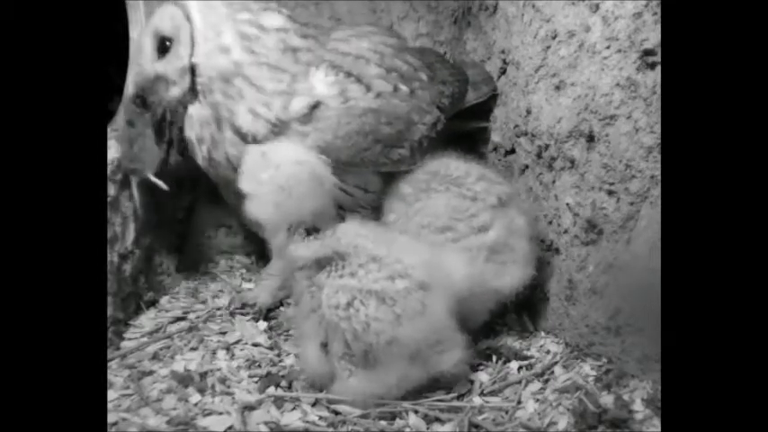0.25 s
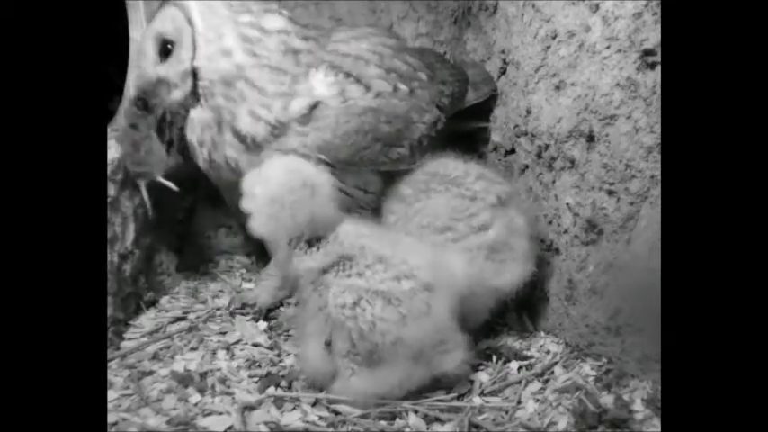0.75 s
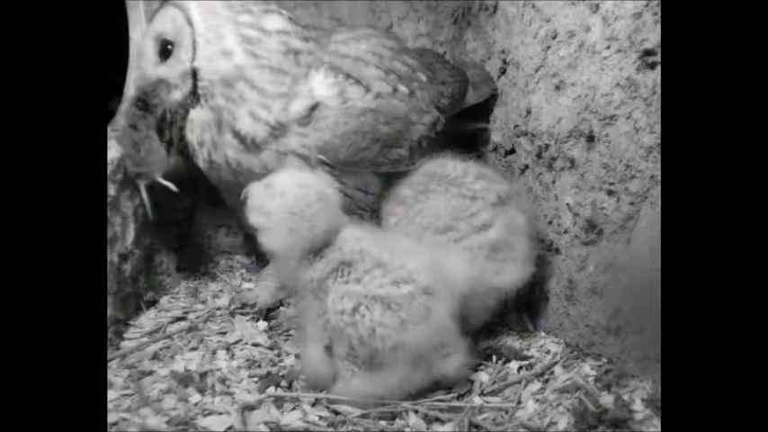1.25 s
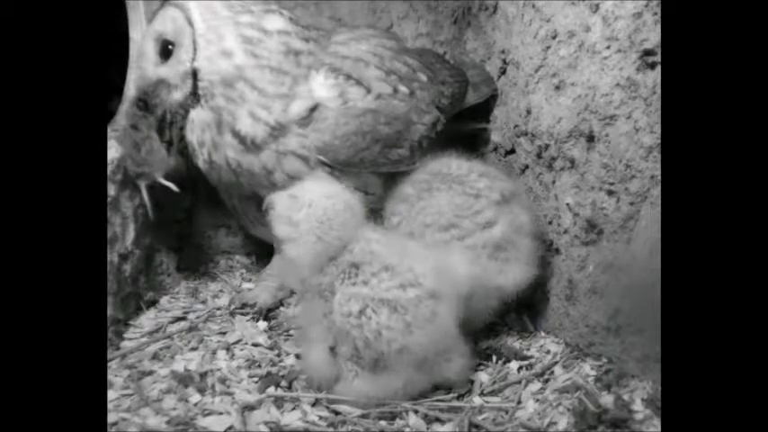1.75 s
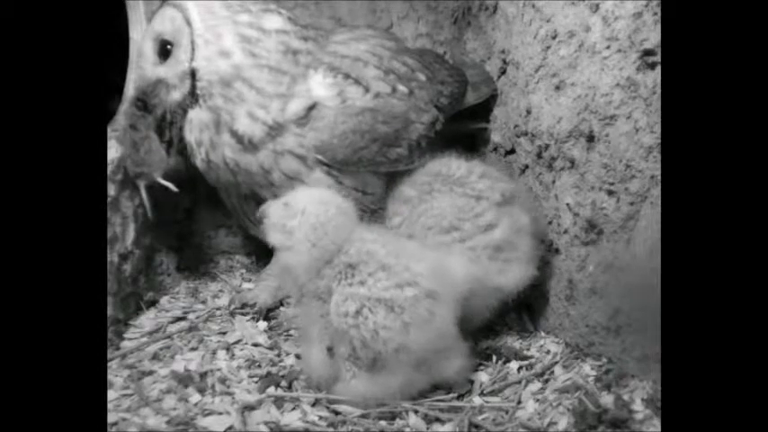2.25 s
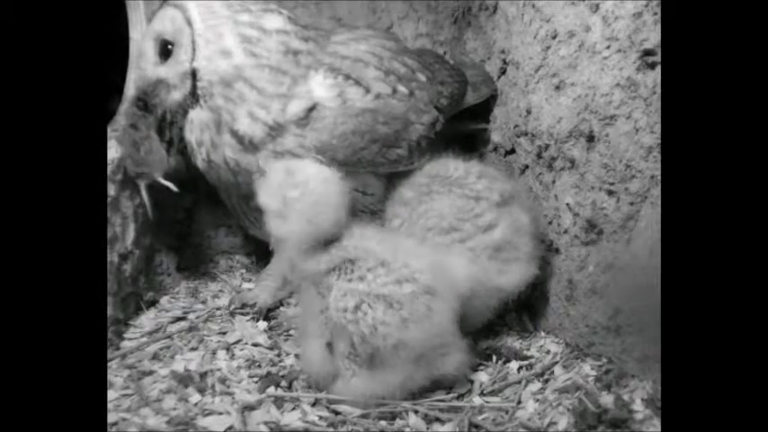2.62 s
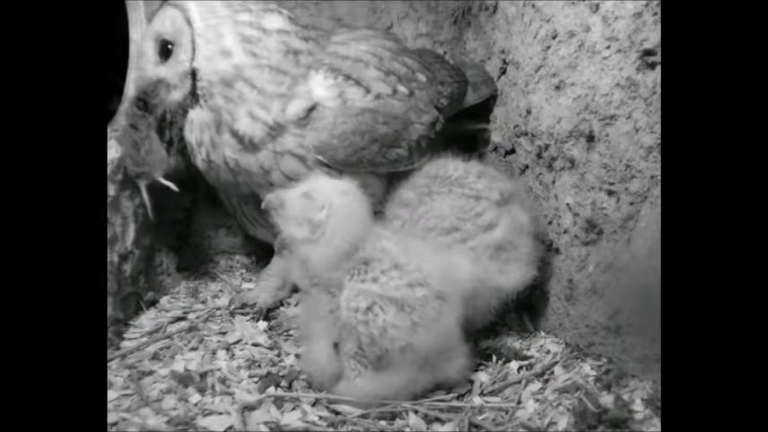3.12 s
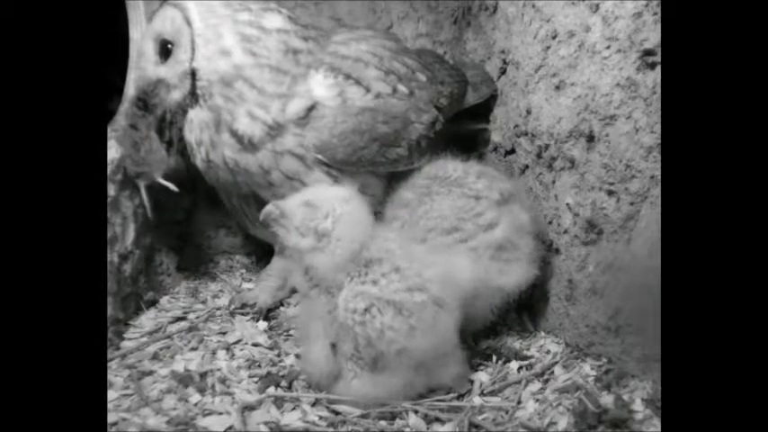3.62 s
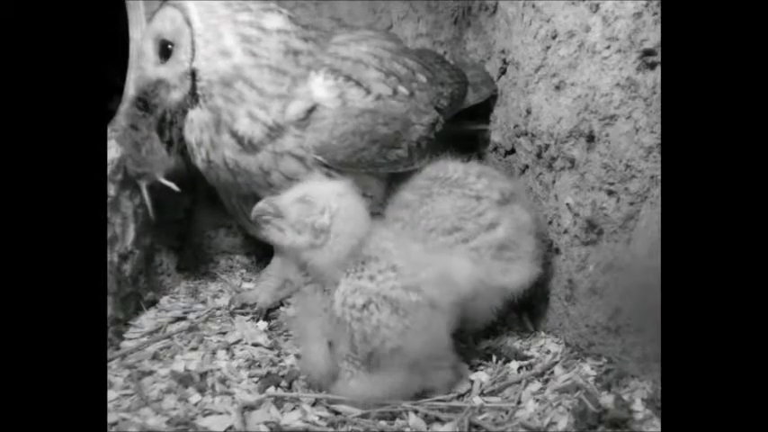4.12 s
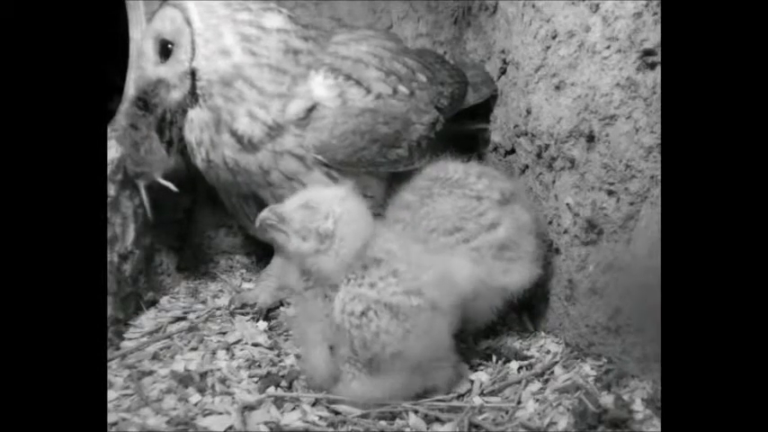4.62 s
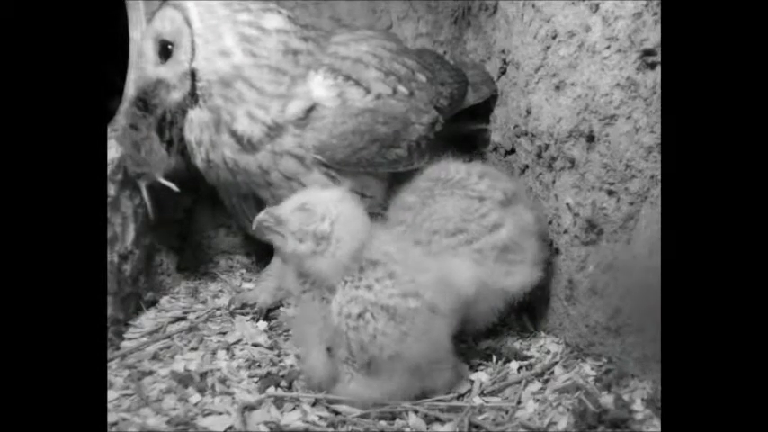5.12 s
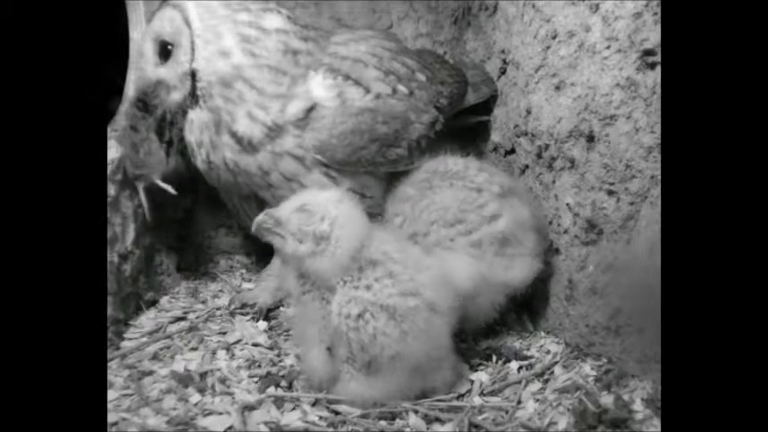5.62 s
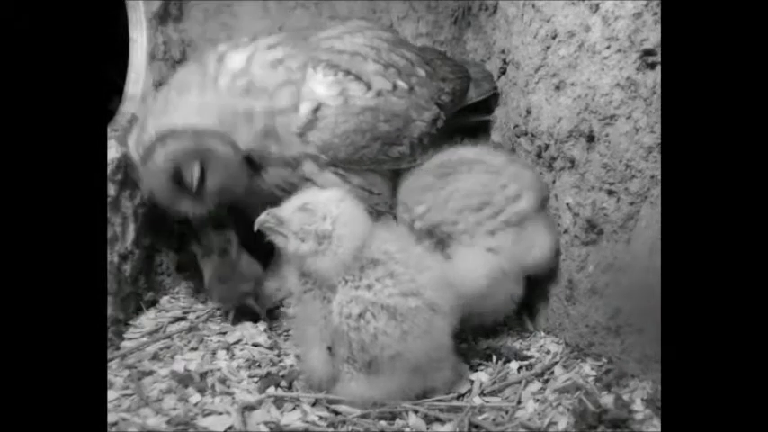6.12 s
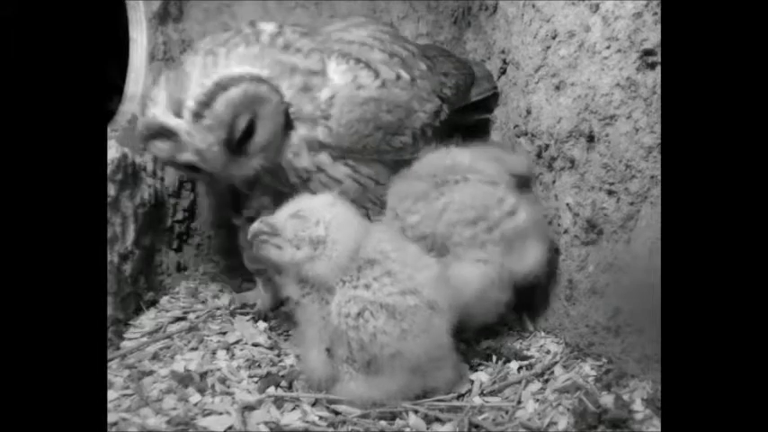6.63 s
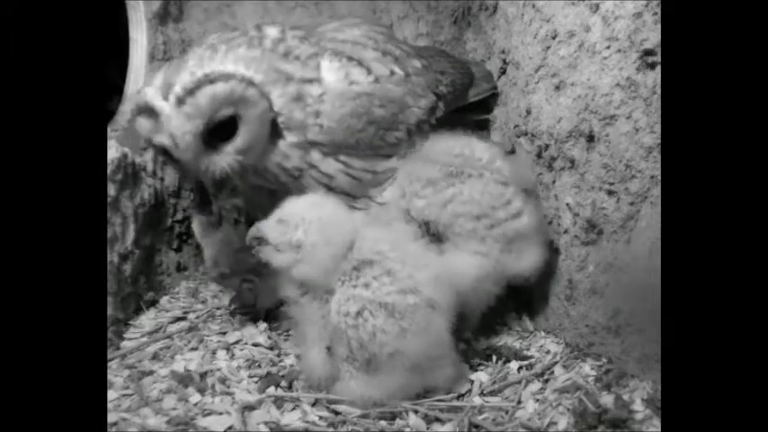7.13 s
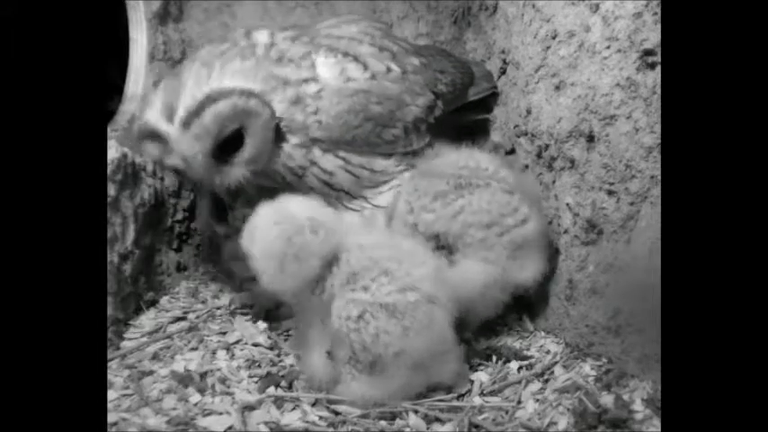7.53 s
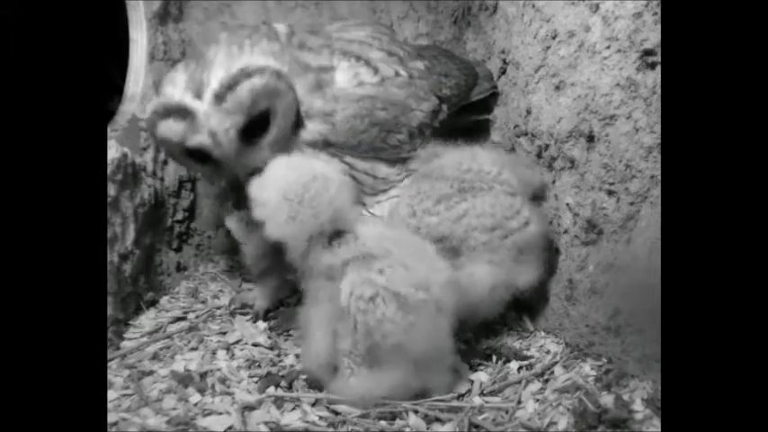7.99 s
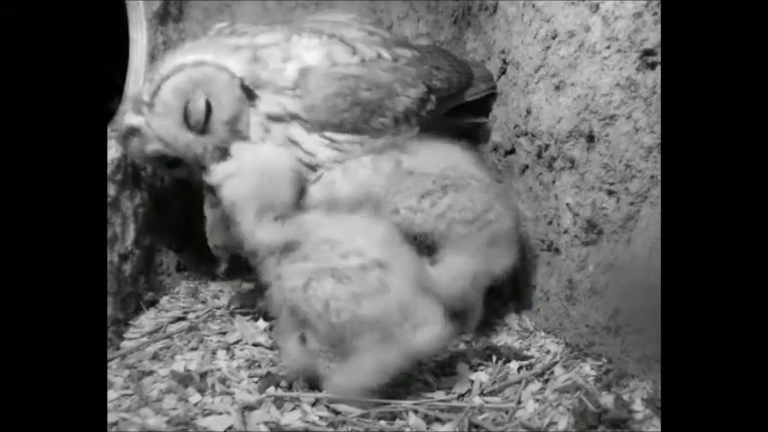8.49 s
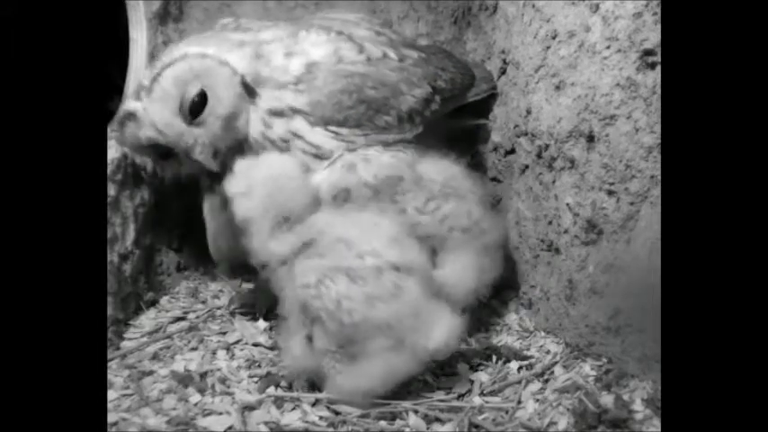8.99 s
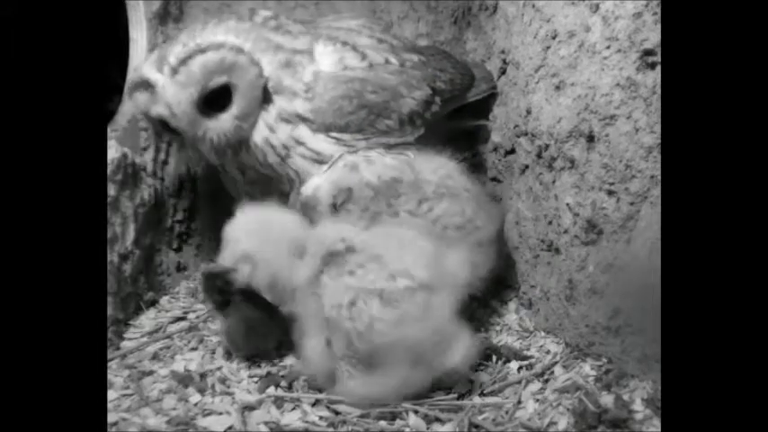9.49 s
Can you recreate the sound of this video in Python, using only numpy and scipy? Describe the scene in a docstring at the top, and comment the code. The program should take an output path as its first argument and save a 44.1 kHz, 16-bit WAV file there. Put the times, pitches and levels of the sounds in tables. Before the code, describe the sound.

Small downy owlets give sparse thin peeps, then burst into urgent raspy chittering runs, with dull floor bumps, crackling litter and a steady deep hum.

```python
"""Owl chicks beg in a nest box: clear whistles near 1 kHz, runs of short pips and thin squeaks, made from tones
with a few overtones, that turn hoarse as filtered noise joins the most excited runs.
A motor outside hums as drifting sine tones and slowly speeds up. Fading tones and noise make the birds' shuffling
and the crackling litter; shaped noise is the background. A cheap nest camera samples the sound coarsely,
which mirrors every call into the treble."""
import sys
import numpy as np
from scipy import signal
from scipy.fft import rfft, irfft, next_fast_len
from scipy.io import wavfile
from scipy.ndimage import uniform_filter1d, map_coordinates

SR = 44100
rng = np.random.default_rng(int(sys.argv[2]) if len(sys.argv) > 2 else 0)


def inscribe(sig):
    """Save sig as 16-bit PCM at rate SR to the path in sys.argv[1].

    A 1-D sig is mono; a 2-D sig holds one channel per row.
    Samples are clipped to [-1, 1] before scaling.
    """
    pcm = np.round(np.clip(np.atleast_2d(sig).T, -1, 1) * 32767)
    wavfile.write(sys.argv[1], SR, pcm.astype(np.int16))


N = 429975
T = np.arange(N) / SR  # time of every sample, in seconds

# Levels in these tables are starting points: the functions add shapes and overall gains.
# The motor's path. Each row: time in seconds, turning rate in Hz, level of the tone at that rate in dB,
# level of the tone at twice that rate in dB.
MOTOR_PATH = [(0, 49.4, -50.5, -62), (1.6, 49.07, -52, -55.5), (2.9, 49.54, -47.5, -52),
              (4.2, 49.7, -46, -48), (5.5, 50.03, -46.5, -49.5), (6.1, 50.86, -49, -40.5),
              (6.8, 52.16, -53, -38), (7.15, 52.7, -57, -43), (7.5, 54.3, -39.5, -44),
              (7.8, 54.8, -51, -46), (8.3, 55.55, -38.5, -39), (8.85, 56.4, -51.5, -40),
              (9.05, 56.66, -48, -46.5), (9.75, 57.84, -49, -47.5)]
# A second, wandering hum. Each row: time in seconds, pitch in Hz, level in dB.
DRONE_PATH = [(0, 61.64, -40.5), (.4, 62.1, -47.5), (2.2, 63.82, -51), (5.5, 68, -59.5),
              (9.75, 67.2, -56.5)]
# The background's loudness. Each row: time in seconds, rumble in dB, box boom in dB, hiss in dB.
BACKGROUND_LEVELS = [(0, -65, -65, -63), (2.6, -65, -65, -64), (5.3, -63.5, -56.5, -58),
                     (6.3, -62, -57, -56), (7.6, -59.5, -56.5, -58.5), (8.5, -57.5, -54, -56),
                     (9.75, -58.5, -59.5, -58.5)]
# Spectrum of the outside rumble. Each row: frequency in Hz, level in dB.
RUMBLE_COLOUR = [(8, -12.5), (14, 4), (22, 0), (45, -3.5), (85, -3), (105, -2), (130, -13), (180, -20.5),
                 (260, -19.5), (500, -49)]
# Spectrum of the low boom inside the box. Each row: frequency in Hz, level in dB.
BOOM_COLOUR = [(150, -48.5), (220, -16.5), (280, 2.5), (325, -1), (380, -15), (470, -25.5), (700, -27),
               (1200, -70.5)]
# Spectrum of the hiss. Each row: frequency in Hz, level in dB.
HISS_COLOUR = [(260, -64), (450, -14), (640, -14.5), (726, -5), (953, -11), (1060, -4.5), (1170, -3.5),
               (1380, 1.5), (1590, -10), (1930, -7), (2150, -7), (2570, -12.5), (2740, -14), (3530, -20),
               (3900, -29), (5070, -64), (8580, -120)]
# Dry cracks of the litter. Each row: start in seconds, level in dB.
LITTER_CRACKS = [(.205, -52), (.218, -50), (.229, -54), (.236, -62), (1.079, -60), (1.229, -62),
                 (2.36, -59), (2.662, -55), (2.682, -57), (4.48, -55)]
# Resonances of the box. Each row: frequency in Hz, width in Hz, level in dB.
BOX_RESONANCES = [(790, 73, 6.5), (1130, 490, -17.5), (1380, 260, 1), (1910, 450, -7.5), (2850, 320, -12)]
# Feet and bodies bump the floor. Each row: start in seconds, pitch in Hz, time to fade by 60 dB in seconds,
# level in dB.
FLOOR_BUMPS = [(0.368, 403.8, 0.051, -64), (1.305, 293, 0.21, -46), (1.899, 438, .08, -56),
               (2.408, 408, 0.14, -55), (2.491, 521, 0.057, -56.5), (5.938, 152, 0.066, -41),
               (6.184, 267, 0.13, -36.5), (6.192, 118.5, 0.24, -32), (8.52, 147, 0.083, -32),
               (8.526, 271, 0.18, -34), (9.249, 325, 0.093, -47), (9.402, 287, 0.06, -39)]
# Spectrum of the swish. Each row: frequency in Hz, level in dB.
SWISH_SPECTRUM = [(400, -14), (1000, -10), (1700, -4.5), (2500, -6), (3300, 1.5), (3900, 12)]
# Extra tones of a raspy voice. Each row: multiple of a third of the pitch (a count), level in dB.
RASP_UNDERTONES = [(1, -11), (2, 0), (4, -13.5), (5, -20), (7, -24), (8, -15.5), (10, -35.5), (11, -21)]
# Scooped peeps that open a run or stand alone. Each row: start in seconds, length in seconds, start pitch in Hz,
# lowest pitch in Hz, level in dB, 2nd harmonic in dB, 3rd harmonic in dB.
PEEP_NOTES = [(0.464, 0.067, 1030, 981, -42, -4.5, -26), (3.555, 0.087, 1056, 962, -40, -0.5, -16),
              (4.26, 0.061, 1099, 980, -38.5, -4.5, -22), (5.107, 0.07, 1062, 978, -39, -1, -16),
              (5.946, 0.077, 1108, 992, -28, -14, -7), (6.591, 0.087, 1074, 996, -28.5, -8.5, -7),
              (7.133, 0.084, 1095, 1002, -27.5, -11, -9.5), (7.669, 0.084, 1041, 986, -32, -4, -8),
              (8.086, 0.059, 1070, 1000, -34.5, -10.5, -13.5), (8.87, 0.072, 1047, 1000, -33.5, -10.5, -10)]
# Short pips. Each row: start in seconds, length in seconds, pitch in Hz, level in dB, rasp from 0 to 1.
PIP_NOTES = [(.532, 0.025, 1107, -59, 0), (0.68, .014, 1074, -38.5, 0.08),
             (0.713, 0.033, 1059, -44.5, 0.03), (.756, .031, 1026, -42.5, 0),
             (.815, 0.016, 1100, -38.5, 0.02), (0.856, 0.027, 1049, -44.5, 0.05),
             (1.827, .027, 1055, -45.5, 0), (1.915, .02, 1116, -41, 0.03), (1.963, .016, 1083, -44.5, 0),
             (3.14, 0.0365, 1049, -45, 0), (3.203, 0.013, 1140, -45.5, 0), (4.348, 0.013, 1077, -45.5, 0),
             (4.433, .014, 1130, -39.5, 0), (4.516, .023, 1096, -42.5, 0), (5.431, 0.026, 1082, -40.5, 0.1),
             (5.454, 0.025, 1043, -37, .1), (5.503, .021, 1108, -33, 0.12), (5.552, .018, 1142, -33.5, 0),
             (5.594, .019, 1158, -34, 0), (5.641, .019, 1200, -34.5, 0.06), (5.676, .024, 1125, -32.5, 0),
             (5.717, 0.022, 1160, -40.5, 0.06), (6.021, 0.032, 1067, -38, 0), (6.056, 0.027, 1085, -33, 0),
             (6.1, .022, 1105, -32, .07), (6.145, .021, 1105, -33, 0.18), (6.182, .019, 1141, -33.5, 0.13),
             (6.224, .02, 1137, -33.5, 0), (6.267, 0.017, 1147, -35, 0.23),
             (6.303, .017, 1136, -33.5, 0.03), (6.672, .032, 1068, -36.5, 0.03),
             (6.705, .033, 1063, -34.5, 0.1), (6.747, .024, 1073, -31.5, 0.19),
             (6.793, 0.019, 1095, -31, 0.06), (6.834, .023, 1127, -32.5, 0.14),
             (6.871, .021, 1112, -32, 0.12), (7.241, .02, 1060, -33.5, 0.04),
             (7.257, .031, 1087, -35, 0.61), (7.315, 0.019, 1100, -33, 0), (7.345, .026, 1062, -33.5, 0.05),
             (7.388, 0.02, 1093, -33.5, 0.13), (7.427, 0.0242, 1122, -33.5, 0.1),
             (7.759, .017, 1027, -37.5, 0), (7.802, 0.014, 1070, -36.5, 0.03),
             (7.846, 0.016, 1120, -42.5, 0.16), (8.179, .013, 1078, -41, 0), (8.231, 0.011, 1130, -46, 0.1),
             (8.276, 0.0096, 1195, -48, 0), (8.319, 0.015, 1110, -41, 0.25), (8.374, 0.012, 1077, -40.5, 0),
             (8.423, .017, 1114, -40, 0.1), (8.472, 0.015, 1108, -42.5, 0), (8.523, .014, 1106, -39, 0.1),
             (8.572, 0.018, 1096, -40.5, 0.11), (8.622, 0.014, 1082, -42.5, 0.1),
             (8.672, 0.04, 1069, -42, 0)]
# The pips' 2nd harmonic, strongest on low notes. Each row: pitch in Hz, level in dB.
PIP_SECOND_HARMONIC = [(980, -6), (1045, -7), (1090, -16), (1130, -18), (1200, -12.5)]
# Held whistles that close a run. Each row: start in seconds, length in seconds, start pitch in Hz,
# middle pitch in Hz, end pitch in Hz, level in dB, 2nd harmonic in dB, 3rd harmonic in dB, rasp from 0 to 1.
HELD_WHISTLES = [(.884, 0.079, 1077, 1067, 1045, -41.5, -9, -31, 0),
                 (3.249, 0.15, 1090, 1053, 1055, -41, -7.5, -31, 0),
                 (4.546, 0.1, 1062, 1080, 1077, -39.5, -10, -33.5, 0.02),
                 (4.65, 0.16, 1036, 1061, 1082, -38.5, -7, -26.5, 0),
                 (5.743, 0.087, 1167, 1178, 1089, -29.5, -14.5, -32, 0.08),
                 (6.34, 0.063, 1183, 1172, 1234, -32, -23, -20, 0.84),
                 (6.409, 0.061, 1093, 1154, 1084, -29.5, -19, -22, 0.49),
                 (6.907, 0.1, 1082, 1171, 1088, -29, -16, -19, 0.46),
                 (7.456, 0.069, 1104, 1125, 1110, -28.5, -17, -18, 0.57),
                 (7.886, 0.052, 1132, 1120, 1087, -35.5, -18.5, -28, 0)]
# Thin glides, most of them between pips. Each row: start in seconds, length in seconds, start pitch in Hz,
# end pitch in Hz, level in dB.
SQUEAK_GLIDES = [(1.078, 0.0098, 2350, 2100, -52), (2.209, 0.008, 2135, 2015, -49),
                 (5.533, .0095, 3330, 2040, -32), (5.574, 0.025, 3640, 1540, -36.5),
                 (5.616, 0.0098, 2980, 3850, -43.5), (5.628, 0.012, 3550, 1490, -34),
                 (6.095, 0.0125, 3380, 2440, -53), (6.131, .008, 3300, 2690, -43),
                 (7.289, 0.0061, 3200, 3900, -51), (7.301, 0.013, 3900, 1830, -41),
                 (7.821, .017, 3770, 1960, -39.5), (8.307, 0.019, 2350, 1355, -50),
                 (8.337, 0.0062, 3200, 3650, -51), (8.361, .01, 2300, 1397, -48.5),
                 (8.406, 0.011, 3360, 1710, -44), (8.448, 0.011, 3300, 2460, -46.5),
                 (8.549, .016, 3670, 1910, -47), (8.604, 0.016, 3720, 1920, -49),
                 (8.644, .013, 3650, 2070, -47)]
# Excited runs, hoarse and strained. Each row: start in seconds, end in seconds, hoarseness in dB,
# lift of the pips' 3rd harmonic in dB.
EXCITED_RUNS = [(5.426, 5.724, -51, -4), (5.716, 5.828, -55.5, -5), (6.061, 6.145, -67, -5.5),
                (6.146, 6.467, -53.5, 6.5), (6.72, 7.007, -54, 0.5), (7.243, 7.516, -61, 4.5),
                (7.765, 7.935, -68, 4), (8.26, 8.7, -63, -1)]
# Spectrum of the hoarse noise. Each row: frequency in Hz, level in dB.
HOARSE_SPECTRUM = [(300, -26.5), (520, -10), (740, 14), (900, -20.5), (1150, 5), (1400, 10.5), (1750, 4),
                   (2300, 3.5), (2650, -6), (3200, 2), (3800, -5)]
# Tone of the camera. Each row: frequency in Hz, level in dB.
CAMERA_TONE = [(1500, -0.5), (3000, 1.65), (4000, 6), (4700, 5), (6000, 4.5), (7200, 2), (8500, -3),
               (10000, -1.5), (12000, -1), (15000, -5.5)]


def amp(db):
    """Turn decibels into a gain."""
    return 10 ** (np.asarray(db) / 20)


def unit(x):
    """Scale a sound to an rms (average strength) of 1."""
    return x / np.sqrt(np.mean(x ** 2) + 1e-20)


def curves(rows, t):
    """Read every column after the first by straight lines, at the points t of the first column."""
    points, *columns = np.transpose(rows)
    return [np.interp(t, points, column) for column in columns]


def wobble(rate, size):
    """A smooth random curve through `rate` random points a second."""
    knots = rng.standard_normal(int(size * rate / SR) + 4)
    return map_coordinates(knots, [np.arange(size) * rate / SR])


def filtered(x, response):
    """Weaken or strengthen each frequency of x by the gain response(Hz)."""
    size = next_fast_len(N + 8192)
    spectrum = rfft(x, size) * response(np.fft.rfftfreq(size, 1 / SR))
    return irfft(spectrum, size)[:N]


def noise(colour):
    """Random noise of rms 1 with the given spectrum, read along a logarithmic frequency scale."""
    f, db = np.transpose(colour)

    def response(hz):
        return amp(np.interp(np.log(hz + 1), np.log(f), db, right=-120))

    return unit(filtered(rng.standard_normal(N), response))


def gate(t, start, end, rise, fall):
    """A loudness curve that opens smoothly around start and closes around end."""
    return (1 + np.tanh((t - start) / rise)) * (1 + np.tanh((end - t) / fall)) / 4


def around(start, end):
    """The samples of a note with a margin on both sides."""
    margin = SR // 50
    return slice(max(int(start * SR) - margin, 0), int(end * SR) + margin)


def hum():
    """Two tones locked to the motor's turning rate mix with a second hum; all three waver slightly."""
    motor_hz, first_db, second_db = curves(MOTOR_PATH, T)
    drone_hz, drone_db = curves(DRONE_PATH, T)
    out = np.zeros(N)
    for hz, db in [(motor_hz, first_db), (2 * motor_hz, second_db), (drone_hz, drone_db)]:
        level = amp(db + 0.45 * wobble(2.9, N))
        phase = 2 * np.pi * np.cumsum(hz) / SR + 0.23 * wobble(7.4, N)
        out += level * np.sin(phase)
    return np.sqrt(2) * out


def background():
    """Three shaped noises: outside rumble, a low boom inside the box, and hiss."""
    rumble_db, boom_db, hiss_db = curves(BACKGROUND_LEVELS, T)
    rumble = amp(rumble_db + 15.0) * noise(RUMBLE_COLOUR)
    boom = amp(boom_db + 2.0) * noise(BOOM_COLOUR)
    hiss = amp(hiss_db + 1.5) * noise(HISS_COLOUR)
    return rumble + boom + hiss


def onsets():
    """Fading noise bursts: dry litter cracks, faint crackles at random times, and a click on each pip."""
    out = np.zeros(N)
    t = np.arange(SR // 20) / SR
    crackles = [(u * (T[-1] - .1), -72 + 10 * v ** 2) for u, v in rng.uniform(size=(70, 2))]
    clicks = [(start + .002, db - 8) for start, _, _, db, _ in PIP_NOTES]
    for start, db in clicks + LITTER_CRACKS + crackles:
        burst = amp(db - 60 * t / 0.041) * rng.standard_normal(len(t))  # falls 60 dB in 41 ms
        out[int(start * SR):][:len(t)] += burst
    return out


def box(x):
    """The small wooden cavity rings briefly at a few resonances."""
    def response(f):
        return sum(amp(db) * 1j * f * width / (centre ** 2 - f * f + 1j * f * width)
                   for centre, width, db in BOX_RESONANCES)

    return filtered(x, response)


def shuffles():
    """Birds shuffle: fading low tones are dull bumps on the floor, and a noise burst is one short, scratchy swish."""
    out = np.zeros(N)
    t = np.arange(SR // 4) / SR
    for start, hz, fade_s, db in FLOOR_BUMPS:
        phase = 2 * np.pi * hz * t + 1.07 * wobble(65, len(t))
        level = amp(db - 60 * t / fade_s) * (1 - np.exp(-t / 0.0017))
        out[int(start * SR):][:len(t)] += level * np.sin(phase)
    crest_s, crest_db = 0.228, -42.5
    rise_db_per_s, fall_db_per_s = 498, 753
    grain_db = 3.1 * wobble(700, N)  # fast changes of level make it scratchy
    slope_db = np.maximum(rise_db_per_s * (crest_s - T), fall_db_per_s * (T - crest_s))
    swish = amp(crest_db - slope_db + grain_db) * noise(SWISH_SPECTRUM)
    return out + swish


def syrinx(hz, second_db, third_db, rasp, jitter):
    """The bird's voice: a tone with two overtones; rasp adds undertones locked to every third cycle."""
    waver = jitter * wobble(450, len(hz)) / (1 + 2 * rasp)  # steadier while it rasps
    phase = 2 * np.pi * np.cumsum(hz * (1 + waver)) / SR + rng.uniform(0, 2 * np.pi)
    tone = np.cos(phase) + amp(second_db) * np.cos(2 * phase) + amp(third_db) * np.cos(3 * phase)
    undertones = sum(amp(db) * np.cos(k * phase / 3) for k, db in RASP_UNDERTONES)
    return np.sqrt(2) * (tone + rasp * undertones)


def peeps():
    """A peep swells quickly and fades while its pitch scoops down and lifts again; it is brightest in the middle."""
    turn, end_lift = 0.684, 0.053  # share of the length where pitch is lowest; rise above that by the end
    crest, swell_db, fade_db = 0.34, 6, 9  # share of the length where it is loudest; rise before, fall after
    out = np.zeros(N)
    for start, length, start_hz, low_hz, db, second_db, third_db in PEEP_NOTES:
        i = around(start, start + length)
        t = T[i] - start
        u = np.clip(t / length, 0, 1)  # progress through the note
        falling = (start_hz / low_hz - 1) * (1 - u / turn) ** 2
        lifting = end_lift * ((u - turn) / (1 - turn)) ** 2
        scoop = np.where(u < turn, falling, lifting)
        swell = swell_db * (1 - u / crest) ** 2
        fade = fade_db * (u - crest) / (1 - crest)
        dip_db = np.where(u < crest, swell, fade)
        edge = (2 * u - 1) ** 2  # 1 at both ends, 0 in the middle
        level = amp(db - dip_db + 0.53 * wobble(150, len(t))) * gate(t, 0.00091, length, 0.0022, 0.0019)
        out[i] += level * syrinx(low_hz * (1 + scoop), second_db - 3 * edge, third_db - 21 * edge, 0, 0.0044)
    return out


def overtones(hz, db):
    """The pips' 2nd and 3rd harmonic levels in dB follow pitch and effort."""
    effort_db = db + 41.5  # an easy call has a level of -41.5 dB
    second_db = curves(PIP_SECOND_HARMONIC, hz)[0] - 0.1 * effort_db
    third_db = -33 + effort_db
    return second_db, third_db


def pips(strain, bright_db):
    """Each pip drops onto its pitch from above, gains its overtones as it settles, and lifts a little as it closes."""
    out = np.zeros(N)
    for start, length, hz, db, rasp in PIP_NOTES:
        i = around(start, start + length)
        t = T[i] - start
        unsettled = np.exp(-np.maximum(t, 0) / 0.00273)
        drop = (.12 + .2 * strain[i]) * unsettled
        lift = 0.024 * np.clip(2 * t / length - 1, 0, 1.3) ** 2
        pitch = hz * (.993 + drop + lift)
        fading_db = db + 1.5 - 2.86 * (t / length - 1.5)
        level = amp(fading_db) * gate(t, 0.0031, length - .001, 0.0027, 0.003)
        thin_db = 1 - 18 * unsettled  # weakens the overtones at first
        second_db, third_db = overtones(hz, db)
        out[i] += level * syrinx(pitch, second_db + thin_db, third_db + bright_db[i] + thin_db,
                                 rasp * (1 - unsettled), .008 + .008 * strain[i])
    return out


def whistles(strain):
    """A whistle bends gently through three pitches, often rasping, then clears and sags; rasp weakens the main note."""
    swoop_share, swoop_s = 0.27, .0025  # strain makes it drop in from above; how quickly it settles
    sag_hz, sag_s, sag_db = 59, 0.0083, 4  # fall in pitch and level towards the end
    out = np.zeros(N)
    for start, length, start_hz, middle_hz, end_hz, db, second_db, third_db, rasp in HELD_WHISTLES:
        i = around(start, start + length)
        t = T[i] - start
        bend = np.polyfit([0, .5, 1], [start_hz, middle_hz, end_hz], 2)
        bent_hz = np.polyval(bend, np.clip(t / length, 0, 1))  # up, down, arched or dipping
        sag = np.exp(np.minimum(t - length, 0) / sag_s)
        swoop = swoop_share * strain[i] * np.exp(-np.maximum(t, 0) / swoop_s)
        pitch = bent_hz * (1 + swoop + .008 * wobble(47.8, len(t))) - sag_hz * sag
        rasping = rasp * gate(t, 0.0063, 0.67 * length, 0.0024, .0018)  # clears at 67% of the length
        level = amp(db - sag_db * sag ** 2 + 1.7 * wobble(67.3, len(t)))
        level = level * gate(t, 0.00095, length, 0.0023, 0.0052) / np.sqrt(1 + rasping ** 2)
        # As the note sags, its 2nd harmonic grows and its 3rd fades.
        out[i] += level * syrinx(pitch, second_db + 10.5 * sag, third_db - 9 * sag,
                                 rasping, 0.0047 + 0.0059 * strain[i])
    return out


def glide(start, length, pitches, overtone_db, jitter):
    """A soft-edged thin tone with one overtone bends through three pitches; gives its samples and its sound."""
    i = around(start, start + length)
    u = (T[i] - start) / length
    hz = np.polyval(np.polyfit([0, .5, 1], pitches, 2), np.clip(u, 0, 1))
    phase = 2 * np.pi * np.cumsum(hz * (1 + jitter * wobble(900, len(u)))) / SR
    tone = np.sin(phase) + amp(overtone_db) * np.sin(2 * phase)
    return i, gate(u, 0.083, 1.0, .12, 0.17) * tone


def squeaks():
    """The voice flips up to a thinner register: short glides, mostly between the pips."""
    out = np.zeros(N)
    for start, length, start_hz, end_hz, db in SQUEAK_GLIDES:
        pitches = [start_hz, (start_hz + end_hz) / 2, end_hz]
        i, tone = glide(start, length, pitches, overtone_db=-36, jitter=0.045)
        out[i] += amp(db + 1.5) * tone
    return out


def slurs(strain):
    """Soft arched notes fill the short gaps between a pip of an excited run and the next note."""
    out = np.zeros(N)
    starts = np.sort([row[0] for row in PIP_NOTES + HELD_WHISTLES + PEEP_NOTES])
    for start, length, hz, db, _ in PIP_NOTES:
        gap = starts[starts > start][0] - start - length
        if .005 < gap < 0.023:  # seconds
            pitches = 1.34 * hz * np.array([.9, 1, .88])
            i, tone = glide(start + length, gap, pitches, overtone_db=-7.5, jitter=0.051)
            out[i] += amp(db - 11.5) * strain[i] * tone
    return out


def chicks():
    """All calls, with noise that follows their loudness: faint throughout, hoarser in the excited runs."""
    husk, strain, bright_db = np.zeros((3, N))
    for start, end, db, lift_db in EXCITED_RUNS:
        i = around(start, end)
        run = gate(T[i], start, end, 0.0057, 0.0048)
        strain[i] += run
        bright_db[i] += run * lift_db
        husk[i] += run * amp(db)
    voice = peeps() + whistles(strain) + pips(strain, bright_db) + squeaks() + slurs(strain)
    loudness = uniform_filter1d(np.abs(voice), size=200)
    opening = loudness / (np.abs(loudness) + 0.0048)  # near 0 in silence, towards 1 in loud calls
    breath_level = amp(4) * husk * opening + amp(-28) * loudness
    return voice + noise(HOARSE_SPECTRUM) * breath_level


def walls(x):
    """Dense, very short reflections inside the box, made with a fading burst of noise."""
    t = np.arange(SR // 6) / SR
    fade = amp(-60 * t / 0.063) * (t > .003)  # starts after 3 ms; falls 60 dB per 63 ms
    tail = rng.standard_normal(len(t)) * fade
    return signal.fftconvolve(x, tail / np.linalg.norm(tail))[:N]


def scene():
    """Everything reaches one microphone inside the box."""
    calls = chicks()
    echo = amp(-12) * walls(calls)
    clicks = amp(11.5) * box(onsets())
    mono = amp(-0.31) * calls + echo + clicks + shuffles() + hum() + background()
    return np.array([mono, mono])


def record(dry):
    """Two crude changes of sample rate mirror the sound into the treble; the camera is mono."""
    mic_sr, stream_sr, top_hz = 8000, 11025, 15700  # samples a second, samples a second, Hz
    heard = filtered(dry[0], lambda hz: 1 / np.sqrt(1 + (hz / 3950) ** 40))  # steep cut near 3950 Hz
    samples = map_coordinates(heard, [np.arange(0, N, SR / mic_sr)], order=3)
    at = np.arange(0, len(samples), mic_sr / stream_sr)
    straight = map_coordinates(samples, [at], order=1)  # straight lines between samples
    smooth = map_coordinates(samples, [at], order=3)  # smooth curves between samples
    stream = .55 * straight + .45 * smooth
    out = np.interp(T, np.arange(len(stream)) / stream_sr, stream)
    out = filtered(out, lambda hz: amp(curves(CAMERA_TONE, hz)[0]) * (hz < top_hz))
    return np.array([out, out])


dry = scene()
out = record(dry)
inscribe(out)
```